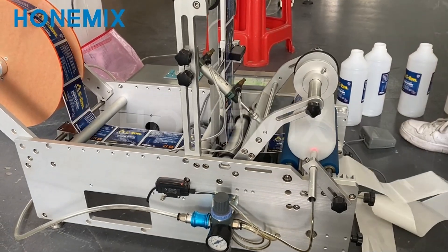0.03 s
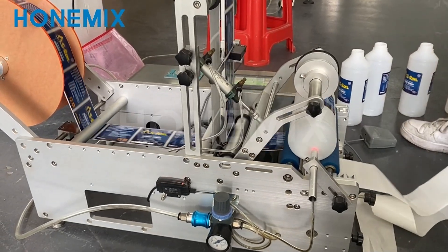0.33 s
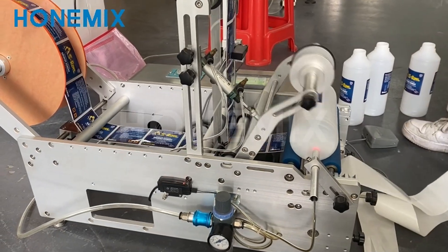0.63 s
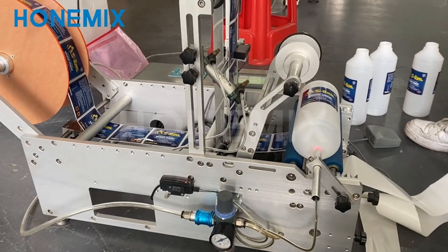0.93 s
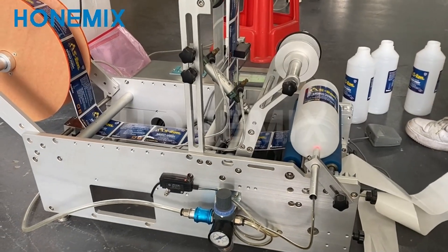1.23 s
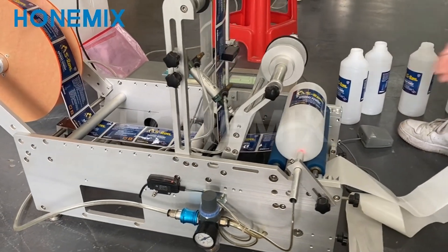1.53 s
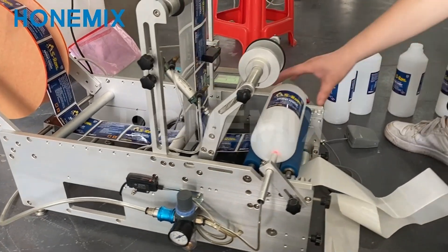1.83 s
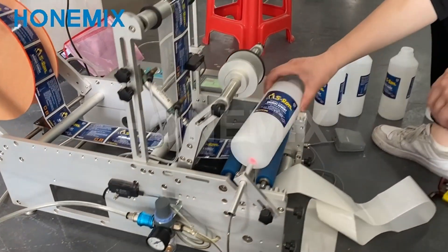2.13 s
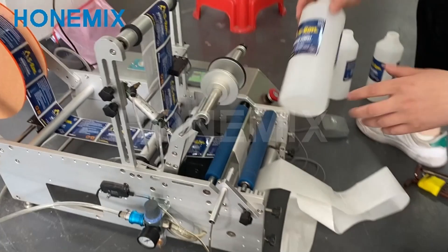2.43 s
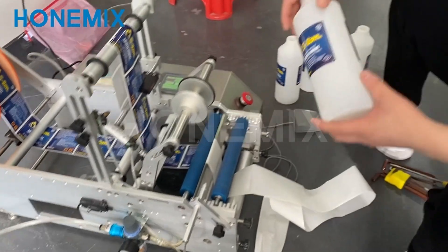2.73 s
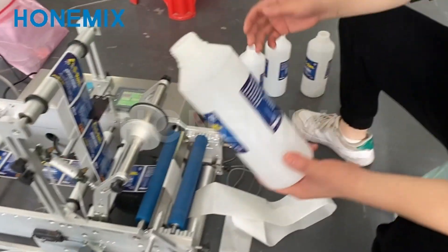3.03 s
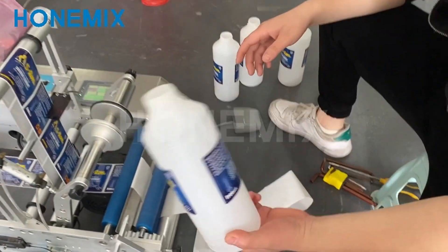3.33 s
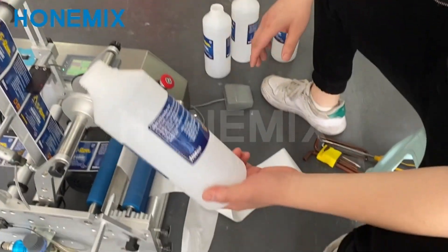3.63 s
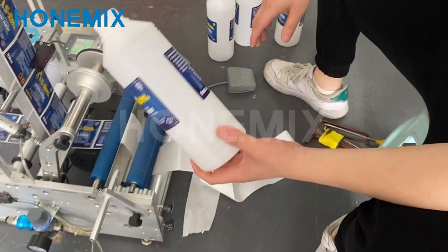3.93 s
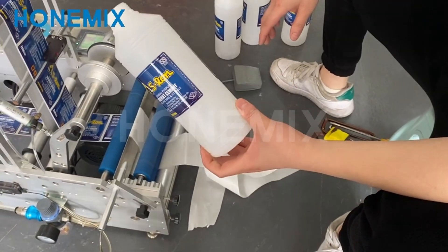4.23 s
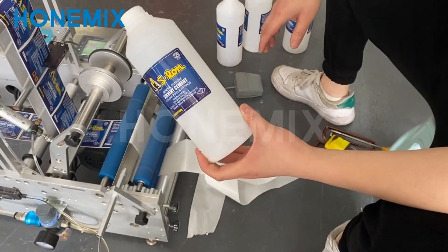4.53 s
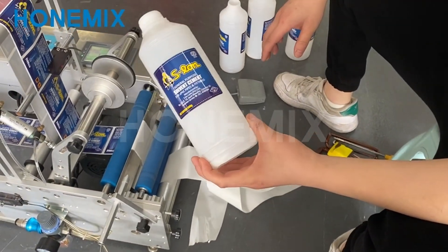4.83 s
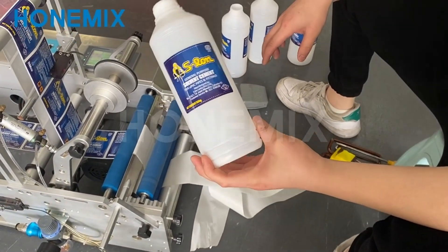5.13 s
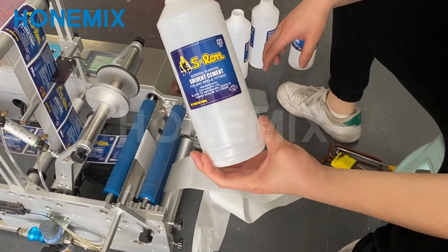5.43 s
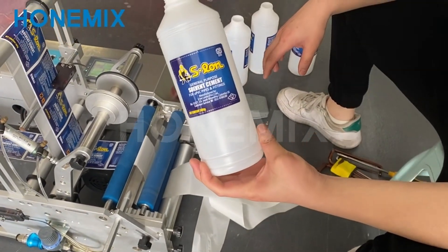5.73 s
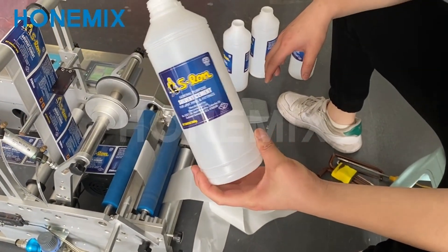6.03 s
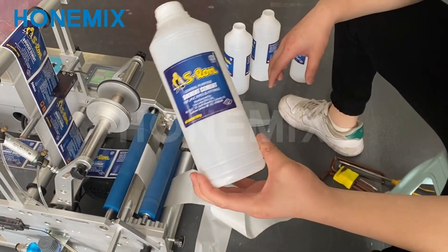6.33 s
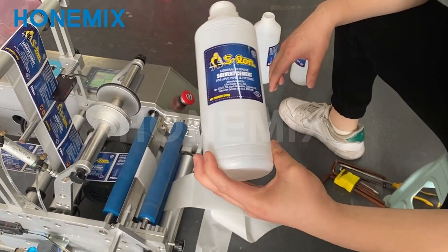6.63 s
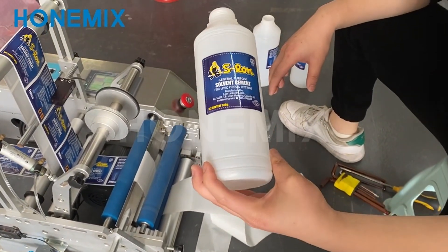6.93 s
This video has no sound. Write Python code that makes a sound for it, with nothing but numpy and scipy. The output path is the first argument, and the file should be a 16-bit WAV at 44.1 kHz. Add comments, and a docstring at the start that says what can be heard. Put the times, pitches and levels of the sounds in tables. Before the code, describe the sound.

A motor whines briefly as a label peels, a metal arm clacks and thumps, then faint bottle handling ticks in a droning workshop.

```python
"""Bench labelling machine in a workshop hall

The motor whines and a roller squeals while a label peels off its backing onto a plastic bottle.
The pressing arm lets go with a puff of air, a clack and a thump, and rattles at the top of its stroke.
Hands then lift and turn the bottle, rubbing and tapping over the hall's rumble; something hisses far off."""
import sys
import numpy as np
from scipy import signal
from scipy.fft import rfft, irfft, next_fast_len
from scipy.io import wavfile

SR = 44100
rng = np.random.default_rng(int(sys.argv[2]) if len(sys.argv) > 2 else 0)


def unload_wav(signal):
    """Save mono or channel-first audio to the path in sys.argv[1] as 16-bit WAV at rate SR, clipped to [-1, 1]."""
    wavfile.write(
        sys.argv[1],
        SR,
        np.round(np.clip(np.atleast_2d(signal).T, -1, 1) * 32767).astype(np.int16),
    )


N = 317079
TIME = np.arange(N) / SR


def from_db(db):
    """Decibels to gain."""
    return 10 ** (np.asarray(db) / 20)


def rms_one(x):
    """Scale to rms 1."""
    return x / np.sqrt(np.mean(x ** 2) + 1e-20)


def at_hz(points, hz):
    """Read a table on a log-frequency axis."""
    freqs, values = np.transpose(points)
    return np.interp(np.log(np.maximum(hz, 1)), np.log(freqs), values)


def drift(rate_hz):
    """Random wander, rms 1."""
    knots = rng.standard_normal(int(N / SR * rate_hz) + 2)
    return rms_one(np.interp(TIME * rate_hz, np.arange(len(knots)), knots))


def envelope(start_s, rise_s, hold_s, release_s):
    """Linear rise, hold, exponential release."""
    age = TIME - start_s
    return np.clip(age / rise_s, 0, 1) * np.exp(-np.maximum(age - rise_s - hold_s, 0) / release_s)


def fading(start_db, db_per_s, start_s=0):
    """Steadily sinking gain."""
    return from_db(start_db - db_per_s * np.maximum(TIME - start_s, 0))


# Width of diffuse sound. Each row: frequency in Hz, side minus mid in dB.
STEREO_WIDTH = [(30, -29), (60, -18.5), (110, -11), (200, -7), (380, -5), (700, 0.5), (1300, 0),
                (15000, -0.5)]

def colour(pair, spectrum):
    """Two unrelated signals become diffuse stereo with this spectrum, rms 1."""
    size = next_fast_len(pair.shape[1])
    hz = np.fft.rfftfreq(size, 1 / SR)
    mid, side = rfft(pair, size) * from_db(at_hz(spectrum, hz))
    width = from_db(at_hz(STEREO_WIDTH, hz))
    both = np.array([mid + width * side, mid - width * side]) / np.sqrt(1 + width ** 2)
    return rms_one(irfft(both, size)[:, :pair.shape[1]])


def noise(spectrum):
    """Diffuse stereo noise."""
    return colour(rng.standard_normal((2, N)), spectrum)


def friction(spectrum, grain_db):
    """Countless tiny slips or snaps: a grainy hiss."""
    grains = rng.standard_normal((2, N)) * from_db(grain_db * drift(700))
    return colour(grains, spectrum)


def resonate(x, hz, width_hz):
    """Two-pole resonance, peak gain 1."""
    r = np.exp(-np.pi * width_hz / SR)
    poles = [1, -2 * r * np.cos(2 * np.pi * hz / SR), r * r]
    return signal.lfilter(np.array([1, 0, -1]) * (1 - r * r) / 2, poles, x + 1e-18)


def body(x, modes):
    """Parallel resonances with alternating signs."""
    return sum((-1) ** k * from_db(db) * resonate(x, hz, width)
               for k, (hz, width, db) in enumerate(modes))


def burst(start_s, decay_s):
    """Contact chatter: stereo noise that starts at once and decays."""
    age = np.arange(SR // 5) / SR
    out, at = np.zeros((2, N)), int(start_s * SR)
    out[:, at:at + len(age)] = rng.standard_normal((2, len(age))) * np.exp(-age / decay_s)
    return out


def ring(blows, modes):
    """Each blow rings every mode with a slightly random strength."""
    out = np.zeros(N)
    starts_s, blows_db = np.transpose(blows)[:2]
    for hz, mode_db, t60_s in modes:
        clicks = np.zeros(N) + 1e-18
        clicks[(starts_s * SR).astype(int)] = from_db(blows_db + mode_db + rng.normal(0, 2, len(blows)))
        r, w = from_db(-60 / (t60_s * SR)), 2 * np.pi * hz / SR
        out += signal.lfilter([0, np.sin(w)], [1, -2 * r * np.cos(w), r * r], clicks)
    return out


def hum(lines, waver_db):
    """Low tones wandering in pitch and level."""
    out = 0
    for hz, wander_hz, line_db in lines:
        phase = 2 * np.pi * np.cumsum(hz + wander_hz * drift(25)) / SR
        out += np.sqrt(2) * from_db(line_db + waver_db * drift(12)) * np.sin(phase)
    return out


def glide(pair, start_s, bend_per_s):
    """Bend the pitch exponentially for one second."""
    bent_s = np.cumsum(np.exp(bend_per_s * np.clip(TIME - start_s, 0, 1))) / SR
    return np.array([np.interp(bent_s, TIME, side) for side in pair])


def at_microphones(pair, scatter_db, lag_above_hz=6600, lag_s=0.000227):
    """The top octave reaches the left microphone late; short waves scatter off the machine."""
    size = next_fast_len(N + 1)
    excess_hz = np.maximum(np.fft.rfftfreq(size, 1 / SR) - lag_above_hz, 0)
    left = irfft(rfft(pair[0], size) * np.exp(-2j * np.pi * excess_hz * lag_s), size)[:N]
    scatter = from_db(scatter_db)
    scattered = scatter * signal.lfilter(*signal.butter(1, 1500, "high", fs=SR), pair[1] + 1e-18)
    return np.array([left + scattered, pair[0] - scattered]) / np.sqrt(1 + scatter ** 2)


# Spectra of the rumble and its bumps. Each row: frequency in Hz, density in dB.
RUMBLE_SPECTRUM = [(15, -34), (28, -21.5), (42, 3), (65, -3), (80, -5), (98, -0.5), (140, -5.5),
                   (172, -7.5), (215, -10.5), (290, -15), (350, -17.5), (500, -22), (620, -26.5),
                   (900, -36.5), (1200, -57), (2000, -120)]
BUMP_SPECTRUM = [(25, -21), (60, 3.5), (140, 4), (280, -3), (450, -11), (700, -22.5), (1200, -55)]
# Rumble level curve and bump peaks. Each row: time in seconds, level in dB.
RUMBLE_LEVELS = [(1.7, -39), (3.1, -37), (5.2, -38.5), (6.8, -38)]
BUMPS = [(1.24, -44.5), (1.60, -35.5), (2.048, -35.5), (2.38, -40), (2.61, -41.5), (2.92, -41.5),
         (3.1, -39), (3.29, -39.5), (4.09, -34.5), (5.17, -40), (5.87, -36.5), (6.31, -41), (7.13, -41.5)]

def rumble(bump_width_s=0.057):
    """The hall's wavering rumble, with soft bumps while the bottle is handled."""
    bed = from_db(np.interp(TIME, *np.transpose(RUMBLE_LEVELS)) + drift(9))
    bumps = sum(from_db(db) * np.exp(-((TIME - peak_s) / bump_width_s) ** 2) for peak_s, db in BUMPS)
    return bed * noise(RUMBLE_SPECTRUM) + bumps * noise(BUMP_SPECTRUM)


# Ventilation tones. Each row: frequency in Hz, wander in Hz, level in dB.
FAN_TONES = [(64.86, 4.95, -39.5), (141.2, 2.5, -47), (210.1, 1.5, -53.5), (246.7, 1.5, -55.5),
             (282.2, 2.5, -58), (297.6, 2, -63), (507, 2, -68.5)]
# The drone grows as the microphone is carried forward. Each row: time in seconds, gain in dB.
FAN_GAINS = [(1.8, -2), (3.5, -0.5), (6.0, 0.5), (7.1, -1)]
# Hall hiss. Each row: frequency in Hz, density in dB.
AIR_SPECTRUM = [(500, -9.5), (750, 3), (1000, 0), (1500, -4.5), (2000, -8.5), (3000, -14.5), (4800, -22.5),
                (6500, -35), (7800, -26.5), (9000, -43.5), (16000, -38)]

def hall_background(air_db=-57):
    """Fans drone over the hall's rumble and faint hiss."""
    fans = from_db(np.interp(TIME, *np.transpose(FAN_GAINS))) * hum(FAN_TONES, waver_db=3)
    return rumble() + from_db(air_db) * noise(AIR_SPECTRUM) + fans


# Motor whine. Each row: frequency in Hz, level in dB.
WHINE_TONES = [(1071, -56.5), (1290, -63), (1879, -52), (2210, -63.5), (2326, -62.5), (2412, -55),
               (2890, -64), (3618, -63), (4834, -65.5), (5297, -63), (6035, -67.5), (6541, -68),
               (6826, -64), (7574, -67.5)]
# Roller rasp. Each row: frequency in Hz, width in Hz, gain in dB.
RASP_MODES = [(1860, 80, -0.5), (2440, 200, 4.5), (5340, 280, -5.5)]
# Roller rush. Each row: frequency in Hz, density in dB.
ROLLER_SPECTRUM = [(200, -5), (400, 3), (900, 3.5), (1500, -5.5), (2400, -0.5), (3300, -7), (4600, -10),
                   (6000, -14), (10000, -21.5), (16000, -35.5)]
# Drive hum. Each row: frequency in Hz, wander in Hz, level in dB.
HUM_TONES = [(121.8, 7.6, -39.5), (248, 30, -49), (327, 17, -54.5)]

def drive(rush_db=-46, rasp_db=-55.5, waver_db=2.5, jitter_rad=0.3, stop_s=0.66, brake_s=0.012):
    """Motor and rollers run from the start, ease off, and brake once the arm has let go."""
    whine = np.zeros((2, N))
    for hz, line_db in WHINE_TONES:
        phase = 2 * np.pi * hz * TIME + jitter_rad * drift(50) + rng.uniform(0, 2 * np.pi, (2, 1))
        whine += np.sqrt(2) * from_db(line_db + waver_db * drift(25)) * np.sin(phase)
    grains = rng.standard_normal((2, N)) * from_db(4.14 * drift(77))
    rasp = from_db(rasp_db) * rms_one(body(grains, RASP_MODES))
    rush = from_db(rush_db) * noise(ROLLER_SPECTRUM)
    effort = fading(-1.55, db_per_s=9) * np.exp(-np.maximum(TIME - stop_s, 0) / brake_s)
    return effort * (whine + rush + rasp + hum(HUM_TONES, waver_db=0.5))


# Slipping roller. Each row: frequency in Hz, width in Hz, gain in dB.
SLIP_MODES = [(4600, 260, 0.5), (4700, 260, -3.5)]

def roller_squeal(grip_s=0.09, release_s=0.027):
    """A roller slips with a narrow, sinking squeal until it grips the bottle."""
    tone = rms_one(body(rng.standard_normal((2, N)), SLIP_MODES))
    gain = fading(-51.5, db_per_s=42.5) * np.exp(-np.maximum(TIME - grip_s, 0) / release_s)
    return gain * glide(tone, 0, bend_per_s=-0.3)


# Contacts of label, rollers and arm. Each row: start in seconds, level in dB, decay in seconds,
# cutoff in Hz, ring frequency in Hz, ring gain in dB, frame gain in dB.
CLACKS = [(0.069, -45.5, 0.0087, 4000, 1476, 7.5, -6.5), (0.119, -36.5, 0.014, 8000, 2150, -8, -2),
          (0.1272, -21, 0.0036, 10000, 3566, -10, -3), (0.162, -39.5, 0.025, 6970, 3270, -8, -2),
          (0.436, -39.5, 0.029, 9000, 3984, -4.5, -1), (0.4464, -32.5, 0.005, 10980, 5400, -5, -1.5),
          (0.476, -44, 0.0035, 5920, 3987, 5.5, -2), (0.5365, -26.5, 0.006, 18300, 11100, -6, -2),
          (0.5388, -16, 0.0046, 18000, 3353, -6, -0.5), (0.547, -25, 0.008, 18000, 7900, -5, -1),
          (0.5528, -20, 0.0033, 17100, 3300, -0.5, -2.5), (0.594, -39, 0.005, 8800, 7500, 3.5, -1),
          (0.792, -36, 0.003, 6030, 2200, 2, -7), (0.7948, -25.5, 0.0044, 4940, 6900, -5.5, -3),
          (0.8178, -28.5, 0.0042, 4500, 6750, -6, -4), (0.8462, -31.5, 0.0083, 4400, 7217, -18, -15),
          (0.952, -42.5, 0.013, 2600, 1960, -12, -9)]
# Aluminium frame. Each row: frequency in Hz, width in Hz, gain in dB.
FRAME_MODES = [(740, 70, 8), (1076, 19, 11.5), (1600, 51, 10), (1850, 120, 9.5), (2300, 500, 8),
               (3250, 70, 6), (3326, 60, 12.5), (3870, 60, 3), (4610, 50, 10.5), (5300, 230, -1.5),
               (8420, 300, 12.5), (8800, 86, -2), (10860, 930, 6), (13400, 270, -0.5), (14500, 900, 7.5)]

def clacks(crack_db=0.5):
    """Each contact cracks, rings the struck part and shakes the frame; softer ones are duller."""
    direct, shaking = np.zeros((2, N)), np.zeros((2, N))
    for start_s, level_db, decay_s, cutoff_hz, ring_hz, ring_db, frame_db in CLACKS:
        hit = from_db(level_db) * burst(start_s, decay_s)
        force = signal.lfilter(*signal.butter(2, cutoff_hz, fs=SR), hit + 1e-18)
        width_hz = 200 * (ring_hz / 4000) ** 2  # higher modes are damped far more
        ringing = resonate(hit, ring_hz, width_hz) * np.sqrt(SR / (np.pi * width_hz))
        direct += from_db(crack_db) * force + from_db(ring_db) * ringing
        shaking += from_db(frame_db) * force
    return at_microphones(direct + body(shaking, FRAME_MODES), scatter_db=-3) * from_db([[0.3], [-0.3]])


# Peeling hiss. Each row: frequency in Hz, density in dB.
PEEL_SPECTRUM = [(500, -12.5), (1500, -6), (3000, -6.5), (5000, -2), (7200, -1), (9000, -5.5),
                 (11000, -0.5), (13200, -2), (15000, -3), (16000, -1)]

def label_peel(start_s=0.091, rise_s=0.014, hold_s=0.4, base_db=-46.5, arch_db=4.5):
    """Glue threads snap as the label leaves its backing in one pull, loudest halfway."""
    progress = np.clip((TIME - start_s) / (rise_s + hold_s), 0, 1)
    arch = from_db(base_db + arch_db * np.sin(np.pi * progress))
    pull = envelope(start_s, rise_s, hold_s, release_s=0.0097)
    return pull * arch * friction(PEEL_SPECTRUM, grain_db=2.2)


# Blows of the arm on the side plates. Each row: start in seconds, level in dB.
ARM_BLOWS = [(0.126, -29.5), (0.449, -33), (0.5419, -16.5), (0.553, -5.5), (0.796, -30.5)]
# Housing. Each row: frequency in Hz, gain in dB, T60 in seconds.
HOUSING_MODES = [(44.87, -30, 0.64), (67, -25, 0.708), (113.1, -22, 0.47), (165, -28.5, .38),
                 (246, -24, 0.5), (290.4, -26, 0.36), (347, -27.5, 0.318), (440, -32.5, 0.31)]

def arm_thumps(start_hz=475, end_hz=38.8, sweep_s=0.0056, swell_s=0.0026):
    """Higher bending waves travel faster, so each thump falls in pitch; the housing rings on."""
    out = ring(ARM_BLOWS, HOUSING_MODES)
    for start_s, peak_db in ARM_BLOWS:
        age = np.maximum(TIME - start_s, 0)
        cycles = end_hz * age + (start_hz - end_hz) * sweep_s * (1 - np.exp(-age / sweep_s))
        gain = from_db(peak_db) * age / swell_s * np.exp(1 - age / swell_s)
        out += gain * np.sin(2 * np.pi * cycles)
    return out


# Side plate. Each row: frequency in Hz, gain in dB, T60 in seconds.
PLATE_MODES = [(733, -13, 0.029), (680, -17.5, 0.04), (794.5, -29.5, 0.022)]

def plate_clang():
    """The arm's blows ring a side plate on the left."""
    return ring(ARM_BLOWS, PLATE_MODES) * from_db([[3.5], [-5]])


# Backing tape singing over its edge, then the piston seal rasping. Each row: start, rise and hold
# in seconds, frequency and width in Hz, relative pitch bend per second, level in dB.
TAPE_AND_SEAL = [(.28, .04, .09, 6890, 260, .3, -62.5), (.59, 0.027, 0.084, 1474, 255.8, -1, -55.5)]

def squeaks(rows, flutter_db):
    """Noise excites narrow resonances that flutter and bend in pitch."""
    out = 0
    for start_s, rise_s, hold_s, hz, width_hz, bend_per_s, db in rows:
        band = resonate(rng.standard_normal((2, N)), hz, width_hz)
        tone = rms_one(resonate(band, hz, width_hz))
        gain = from_db(db + flutter_db * drift(35)) * envelope(start_s, rise_s, hold_s, release_s=0.049)
        out += gain * glide(tone, start_s, bend_per_s)
    return out


# Blow on the pin. Each row: start in seconds, level in dB.
PIN_BLOWS = [(0.4535, -21)]
# Steel pin. Each row: frequency in Hz, gain in dB, T60 in seconds.
PIN_MODES = [(3750, 0, .035), (5350, -14, .03), (7540, -12, 0.033)]

def pin_clink():
    """A steel pin rings as the label runs out."""
    return ring(PIN_BLOWS, PIN_MODES)


# Escaping air. Each row: frequency in Hz, density in dB.
VENT_SPECTRUM = [(400, -12.5), (1500, 6.5), (5000, -3), (8000, -3.5), (12000, -12), (16000, -8.5)]

def air_vent(open_s=0.509, rise_s=0.034):
    """The cylinder puffs as its valve opens, then leaks while the arm swings up."""
    puff = from_db(-34) * envelope(open_s, rise_s, hold_s=0.02, release_s=0.025)
    leak = envelope(open_s, rise_s, hold_s=0.31, release_s=0.018)
    leak *= fading(-45, db_per_s=29.5, start_s=open_s)
    return np.hypot(puff, leak) * noise(VENT_SPECTRUM)


def strokes(rows, release_share=0.41):
    """Gain of a run of strokes; longer ones die more slowly, and overlaps add in power."""
    return np.sqrt(sum((from_db(db) * envelope(start, rise, hold, release_share * (rise + hold))) ** 2
                       for start, rise, hold, db in rows))


# Strokes on the bottle and of the sleeves. Each row: start, rise and hold in seconds, level in dB.
BRUSH_STROKES = [(0.88, 0.11, 0.13, -77), (1.39, 0.2, 0.028, -66.5), (1.72, 0.11, 0.39, -78.5),
                 (2.02, .025, 0.034, -75.5), (2.62, 0.2, 0.29, -76), (3.0, 0.15, 0.053, -71.5),
                 (3.45, 0.016, 0.03, -65.5), (3.51, 0.04, 0.28, -80), (4.03, 0.025, 0.17, -70.5),
                 (5.17, 0.021, 0.022, -73.5), (5.43, 0.044, 0.02, -83), (5.8, .1, 0.57, -93),
                 (6.025, 0.022, 0.029, -82), (6.45, 0.021, 0.058, -71), (6.52, 0.034, 0.13, -82.5)]
SLEEVE_STROKES = [(4.2, .04, 0.12, -62.5), (5.57, 0.026, 0.044, -61), (6.28, 0.027, .05, -60)]
# Their spectra. Each row: frequency in Hz, density in dB.
BRUSH_SPECTRUM = [(400, 1.5), (1500, 7.5), (3500, 3), (5500, -0.5), (7500, 2), (9000, 3), (11000, -2.5),
                  (16000, -3)]
SLEEVE_SPECTRUM = [(300, -1), (1200, 5.5), (2500, -8), (5000, -21), (12000, -50)]

def rubbing():
    """Skin brushes the bottle; sleeves rustle."""
    brushing = from_db(9) * strokes(BRUSH_STROKES) * friction(BRUSH_SPECTRUM, grain_db=0.5)
    rustling = strokes(SLEEVE_STROKES) * friction(SLEEVE_SPECTRUM, grain_db=3)
    return at_microphones(brushing, scatter_db=-4) + rustling


# Taps. Each row: start in seconds, body level in dB, tick level in dB, knock in Hz, knock level in dB.
FINGER_TAPS = [(1.561, -54.5, -50, 450, -56), (2.044, -41.5, -67, 380, -55), (2.069, -46, -77, 373, -40),
               (2.361, -44.5, -54.5, 450, -60), (2.585, -66, -72, 503, -40), (2.90, -50.5, -62, 670, -47),
               (2.931, -44.5, -56.5, 720, -46), (3.057, -46, -74, 402, -40), (3.15, -54.5, -73, 604, -47),
               (3.387, -47.5, -65, 708, -41.5), (3.491, -43, -61, 454, -54), (4.122, -46, -70, 720, -52),
               (4.153, -53.5, -60, 564, -39.5), (4.549, -46.5, -81, 446, -43.5),
               (4.605, -55, -82, 514, -46.5), (4.982, -44.5, -83, 400, -57), (5.189, -45, -73, 451, -54),
               (6.271, -45.5, -75, 452, -55), (6.50, -46, -59, 445, -45)]
# Hollow bottle. Each row: frequency in Hz, gain in dB, T60 in seconds.
BOTTLE_MODES = [(216.7, 5.5, 0.35), (329.4, 0.5, 0.2), (421, -9.5, 0.091), (513, -9, 0.2),
                (670, -23, 0.081), (1284, -16, 0.075)]

def finger_taps(tick_decay_s=0.0029, knock_t60_s=0.045, cutoff_hz=1100):
    """A soft fingertip gives a tiny tick, a dull knock of the wall and a hollow note."""
    ticks = sum(from_db(db) * burst(start, tick_decay_s) for start, _, db, _, _ in FINGER_TAPS)
    knocks = sum(ring([(start, db)], [(hz, 0, knock_t60_s)]) for start, _, _, hz, db in FINGER_TAPS)
    hollow = ring(FINGER_TAPS, BOTTLE_MODES)
    softened = signal.lfilter(*signal.butter(2, cutoff_hz, fs=SR), hollow + knocks)
    return softened + at_microphones(ticks, scatter_db=-8)


# Surges of the far hiss. Each row: start, rise and hold in seconds, level in dB.
FAR_SURGES = [(2.57, 0.04, 0.22, -61), (2.89, 0.11, 0.12, -63)]
# Its spectrum. Each row: frequency in Hz, density in dB.
FAR_SPECTRUM = [(1000, -27), (2000, -9), (2600, 11.5), (4000, 6), (5400, -3), (6200, -9), (12000, -22)]
# Its resonances. Each row: start, rise and hold in seconds, frequency and width in Hz,
# relative pitch bend per second, level in dB.
FAR_RESONANCES = [(2.55, 0.053, .15, 3100, 480, -0.18, -60.5), (2.60, 0.077, 0.36, 4580, 420, 0.05, -71),
                  (2.63, 0.052, 0.11, 5230, 420, 0.092, -72), (2.77, .04, 0.17, 2930, 480, .2, -62),
                  (3.55, 0.073, 0.29, 4430, 450, .03, -78)]

def far_hiss():
    """A thin, ringing hiss arrives from all sides of the hall."""
    return strokes(FAR_SURGES) * noise(FAR_SPECTRUM) + squeaks(FAR_RESONANCES, flutter_db=-1.5)


# Hall decay. Each row: frequency in Hz, T60 in seconds.
TAIL_T60 = [(100, 1.5), (400, 2.5), (1000, 2.5), (2500, 1.5), (5000, 0.5), (8000, 2), (15000, 0)]
# Spectra of the tail and the early reflections. Each row: frequency in Hz, gain in dB.
TAIL_SPECTRUM = [(60, -5.5), (250, -9), (500, -3), (1000, -5), (2500, -3.5), (3300, -6.5), (5000, 2),
                 (8000, -25.5), (15000, -14.5)]
EARLY_SPECTRUM = [(100, -8.5), (500, -1), (1500, 1), (6000, -4.5), (15000, -6.5)]

def hall_echo(x, early_db=-11.5, early_decay_s=0.033, tail_db=-16):
    """Quick reflections off floor and machine, then a long tail that dies sooner in the treble."""
    age = np.arange(2 * SR) / SR
    edges_hz = np.geomspace(40, 18000, 14)
    tail = 0
    for low, high in zip(edges_hz, edges_hz[1:]):
        bandpass = signal.butter(2, [low, high], "band", fs=SR, output="sos")
        band = signal.sosfilt(bandpass, rng.standard_normal((2, len(age))))
        tail += band * from_db(-60 * age / at_hz(TAIL_T60, np.sqrt(low * high)))
    tail = colour(tail * (1 - np.exp(-age / 0.0032)), TAIL_SPECTRUM)
    early = rng.standard_normal(tail.shape) * np.exp(-age / early_decay_s)
    early = colour(early * (1 - np.exp(-age / 0.0064)), EARLY_SPECTRUM)
    response = (from_db(early_db) * early + from_db(tail_db) * tail) / np.sqrt(len(age))
    return signal.fftconvolve(x, response, axes=1)[:, :N]


def scene():
    """Machine and taps echo in the hall; the plate's clang and the rubbing stay dry."""
    contacts = clacks()
    thumps = arm_thumps()
    clang = plate_clang()
    feed = drive() + roller_squeal() + label_peel() + squeaks(TAPE_AND_SEAL, flutter_db=4.5)
    bench = contacts + feed + pin_clink() + air_vent() + finger_taps()
    echo = hall_echo(bench + from_db(-3.5) * thumps)
    return bench + thumps + clang + echo + rubbing() + far_hiss() + hall_background()


def record(dry, low_cut_hz=11, high_cut_hz=15900):
    """The microphone loses the deepest bass; the top is cut steeply."""
    dry = signal.sosfilt(signal.butter(4, low_cut_hz, "high", fs=SR, output="sos"), dry)
    return signal.sosfilt(signal.ellip(12, 0.1, 80, high_cut_hz, fs=SR, output="sos"), dry)


dry = scene()
out = record(dry)
unload_wav(out)
```